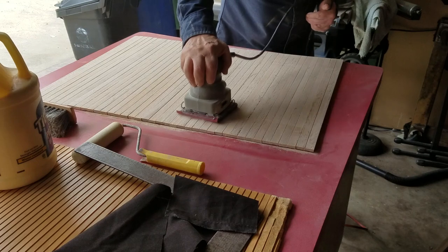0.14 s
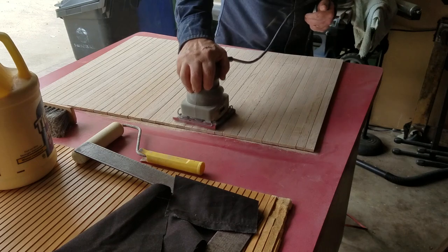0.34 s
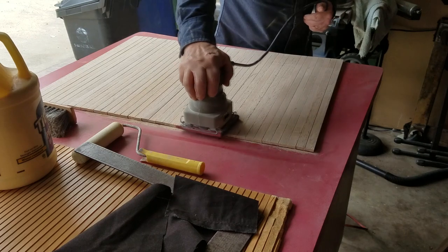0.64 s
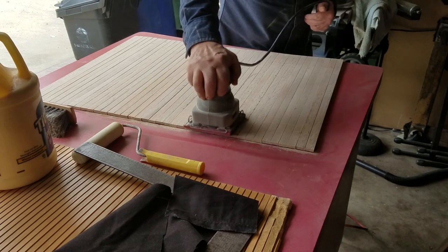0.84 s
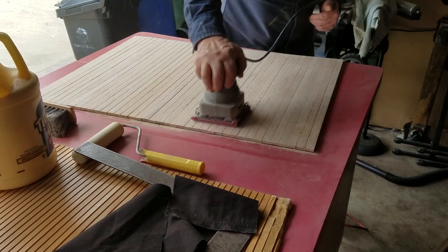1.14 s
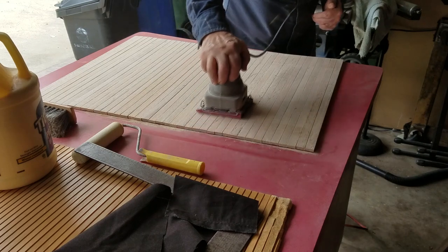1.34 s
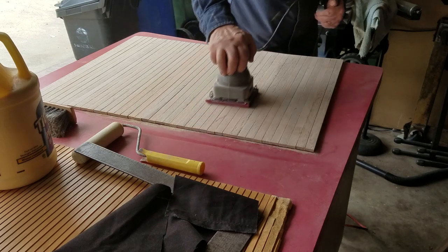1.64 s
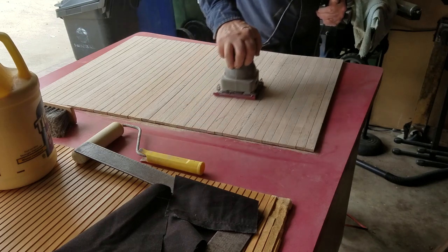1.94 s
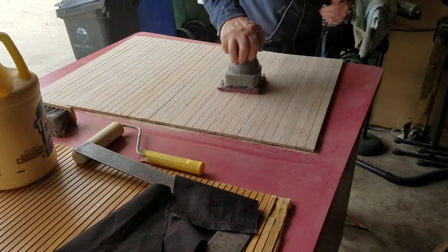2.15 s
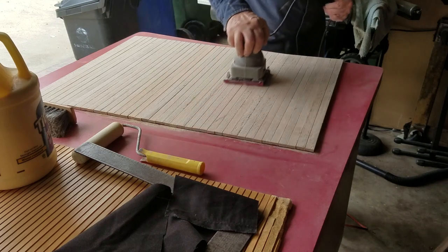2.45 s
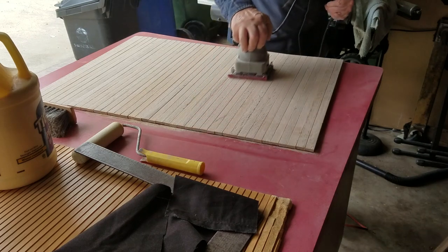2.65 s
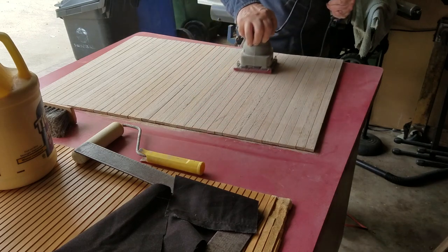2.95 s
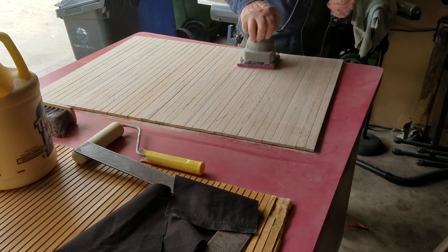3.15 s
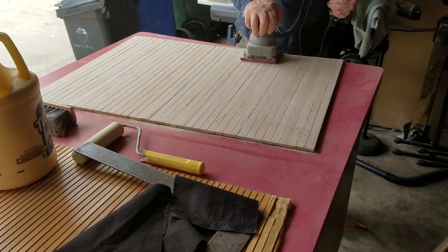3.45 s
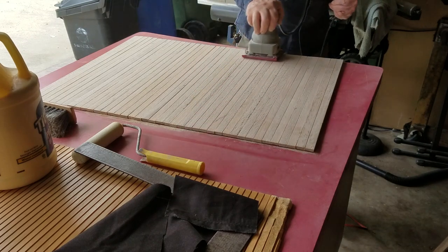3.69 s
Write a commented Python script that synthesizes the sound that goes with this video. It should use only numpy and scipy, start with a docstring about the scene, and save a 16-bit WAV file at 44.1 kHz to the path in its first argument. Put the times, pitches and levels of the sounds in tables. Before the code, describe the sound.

An electric palm sander buzzes steadily on a wooden panel, with one low thump.

```python
"""An electric palm sander buzzes on a wooden panel, starting at the front edge, on the left.
Its pad shakes the panel once a turn, the paper hisses in step and the fan rushes.
A faint rumble grows and ends in one low thump at 0.72 s.
The sander then slides right, over the middle to the back edge; each place colours the buzz differently."""
import sys
import numpy as np
from scipy.fft import rfft, irfft, next_fast_len
from scipy.io import wavfile
from scipy.ndimage import uniform_filter1d, map_coordinates

SR = 44100
rng = np.random.default_rng(int(sys.argv[2]) if len(sys.argv) > 2 else 0)


def dump_mix(stems):
    """Bounce the given channels to the path in sys.argv[1] as a 16-bit WAV at rate SR."""
    frames = np.atleast_2d(stems).T  # one column per channel
    limited = np.clip(frames, -1, 1)  # hard clip at full scale
    pcm = np.round(limited * 32767).astype(np.int16)
    wavfile.write(sys.argv[1], SR, pcm)


N = 168462

# motor speed (time [s], turn rate [Hz])
MOTOR_SPEED = [(0.0, 224.1), (0.52, 223.9), (0.65, 222.8), (1.4, 221.4), (2.5, 223.5), (3.41, 227),
               (3.82, 229.9)]
NOMINAL_HZ = MOTOR_SPEED[0][1]


def amp(db):
    """Decibels to gain."""
    return 10 ** (np.asarray(db) / 20)


def along(points, key):
    """Table read on a log axis of frequency or order."""
    keys, values = np.transpose(points)
    return np.interp(np.log(key + 1), np.log(keys + 1), values)


def curve(rows):
    """Time table, one value per sample."""
    return np.interp(np.arange(N) / SR, *np.transpose(rows))


def wobble(rate_hz):
    """Smooth random curve, rate_hz knots a second."""
    knots = rng.standard_normal(1024)
    grid = np.linspace(0, N, 2048)
    spline = map_coordinates(knots, [grid * rate_hz / SR], mode="wrap")
    return np.interp(np.arange(N), grid, spline)


def filtered(x, response):
    """Apply a gain given as a function of frequency."""
    size = next_fast_len(N + SR // 4)
    return irfft(rfft(x, size) * response(np.fft.rfftfreq(size, 1 / SR)), size)[..., :N]


def steady(x):
    """Hold the slow level at rms 1."""
    power = uniform_filter1d(np.mean(x ** 2, axis=0), size=8192)
    return x / np.sqrt(abs(power) + 1e-12)


def noise(spectrum, gate=1):
    """Gated, coloured stereo noise of rms 1: bass near mono, treble unrelated."""
    # left-right likeness (frequency [Hz], correlation [-1..1])
    likeness = [(30, 0.85), (200, 1), (600, 0.89), (1200, 0.44), (2500, 0.35), (5000, 0.41), (9000, .1),
                (15000, .03)]

    def mid_side_gains(hz):
        spread_rad = np.arccos(along(likeness, hz)) / 2
        return amp(along(spectrum, hz)) * [np.cos(spread_rad), np.sin(spread_rad)]

    mid, side = filtered(gate * rng.standard_normal((2, N)), mid_side_gains)
    stereo = np.array([mid + side, mid - side])
    return stereo / np.sqrt(np.mean(stereo ** 2) + 1e-20)


def rumble():
    """Faint low noise that grows, then drops away at the thump."""
    # loudness (time [s], level [dB])
    level = [(0, -82), (.2, -74), (.45, -71), (.6, -77), (.72, -68), (.79, -94), (3.82, -93)]
    # colour (frequency [Hz], relative density [dB])
    spectrum = [(15, 7), (30, 18), (55, -8), (100, -28), (250, -40), (1000, -90)]
    return amp(curve(level)) * noise(spectrum)


def thump():
    """A few low cycles that swell and stop short."""
    start_s, length_s, attack_s, release_s = 0.7238, 0.0228, 0.0042, 0.0038
    pitch_hz, low_cut_hz = 134, 50
    t = np.arange(N) / SR - start_s
    envelope = np.clip(t / attack_s, 0, 1) * np.clip((length_s - t) / release_s, 0, 1)
    phase = 2 * np.pi * pitch_hz * t
    burst = amp(-25) * envelope * (np.sin(phase) + amp(-11) * np.sin(2 * phase))
    return filtered(burst, lambda hz: hz ** 2 / (hz ** 2 + low_cut_hz ** 2))


def fan():
    """Steady rush of fan and pad."""
    # colour (frequency [Hz], relative density [dB])
    spectrum = [(40, -28), (65, -14.5), (95, -8.5), (140, -15.5), (250, -7.5), (340, -16.5), (480, -7.5),
                (620, -3), (780, 1.5), (1000, -1), (1300, -4), (1900, -3), (2600, -6.5), (4000, -14),
                (8000, -28)]
    return amp(-51.5) * noise(spectrum)


def paper(angle):
    """Grit scrapes the wood, hardest on the out and back stroke of each turn; the top hiss is smoother."""
    # hiss (time [s], base level [dB])
    level = [(0.0, -62.5), (0.15, -62), (0.96, -60.5), (1.23, -60), (2.81, -59), (3.62, -61), (3.65, -58),
             (3.8, -61.5), (3.82, -58)]
    # paper on wood, and the grit's high fizz (frequency [Hz], relative density [dB])
    scrape_spectrum = [(800, -32), (2200, -9.5), (3600, 1.5), (5200, 1), (6500, -2.5), (8300, -2.5),
                       (9700, -11.5), (12000, -10), (15800, -20)]
    fizz_spectrum = [(3000, -20), (7000, -13.5), (9700, -3.5), (12000, 2), (14000, -.5), (15800, -4)]
    stroke = np.exp(0.22 * np.cos(angle) + 0.34 * np.cos(2 * angle))
    grain = amp(wobble(rate_hz=250))
    scrape = amp(3) * noise(scrape_spectrum, gate=stroke * grain)
    fizz = amp(4) * noise(fizz_spectrum, gate=stroke ** 0.61)
    return amp(curve(level)) * (scrape + fizz)


def panel_db(place, tables, key):
    """The panel's response, sliding between its front, middle and back colours."""
    return np.interp(place, np.arange(len(tables)), [along(table, key) for table in tables])


def spots_db(order):
    """An order swells or sinks as the pad crosses its live and dead spots."""
    # spots on the panel (time [s], length [s], order [-], boost [dB])
    spots = [(.59, 0.26, 7, 8), (1.06, .45, 13, 9.5), (1.43, .32, 22, 9), (1.547, 0.74, 2, -3.5),
             (2.25, 0.28, 24, 2), (2.55, .45, 9, -9.5), (2.62, .4, 19, 8), (3.08, .35, 7, 4),
             (3.17, 0.18, 18, 5), (3.765, 0.15, 36, 9.5), (3.8, 0.36, 2, 6.5)]
    t = np.arange(N) / SR
    return sum(boost_db * np.exp(-(2 * (t - time_s) / length_s) ** 2)
               for time_s, length_s, k, boost_db in spots if k == order)


def partial(angle, order, level_db, fade_db=0, fade_hz=2.396, pan_db=0):
    """One multiple of the motor speed, fading and fluttering; low orders pan with the sander."""
    # sander's sideways path (time [s], position [-1 left, 1 right])
    across = [(0, -.9), (.7, -1.2), (1.6, -0.71), (2.1, 0.26), (2.6, 0.57), (3.1, 0.56), (3.82, 0.61)]
    flutter_db, flutter_hz = 0.6, 35
    scatter_rad, drift_rad = 1.22, 0.48  # the panel smears each stroke
    lead_s, direct_hz = 0.00015, 1110  # left microphone's lead; echoes blur direction above direct_hz
    hz = order * NOMINAL_HZ
    level_db = level_db + spots_db(order) + fade_db * wobble(fade_hz) + flutter_db * wobble(flutter_hz)
    phase = order * angle + scatter_rad * rng.standard_normal() + drift_rad * wobble(fade_hz)

    # the microphones differ by direction, plus a random part growing with pitch
    leftward = -curve(across) / (1 + (hz / direct_hz) ** 6)
    diffuse = (hz / 850) ** 0.48 * min(fade_db, 1)
    apart_rad = np.pi * hz * lead_s * leftward + 0.23 * diffuse * wobble(fade_hz)
    direction_db = 1.5 * leftward * min(2 * hz / direct_hz, 1)
    lean = amp((pan_db + direction_db + 2.5 * diffuse * wobble(fade_hz)) / 2)
    gains = amp(level_db) * np.array([lean, 1 / lean]) * 2 / (lean + 1 / lean)
    phases = np.array([phase + apart_rad, phase - apart_rad], dtype=np.float32)
    return np.sqrt(2) * gains * np.sin(phases)


def rattle(angle, place):
    """The pad's hard strokes: orders 13-47, coming and going quickly."""
    # treble rattle (time [s], base level [dB])
    level = [(0.0, -54), (0.46, -55), (0.74, -55), (0.77, -51.5), (0.9, -55.5), (1.81, -50.5),
             (2.01, -52.5), (2.34, -50.5), (2.8, -55), (3.04, -54), (3.15, -49.5), (3.48, -51),
             (3.82, -48.5)]
    # colour at each place (frequency [Hz], relative level [dB])
    front = [(2900, 0.5), (3130, 0), (3350, -5), (3600, -1), (4200, -4), (4500, -3), (4900, -1),
             (5500, -7.5), (6500, -15), (8200, -12.5), (11000, -23)]
    middle = [(2880, 1), (3120, -12), (3350, -9), (3770, 3), (4220, -7.5), (4440, -3.5), (4880, -4),
              (5110, -8.5), (5340, 2.5), (5800, -12), (6800, -18), (8400, -9.5), (11000, -14)]
    back = [(2900, -3.5), (3350, -8), (3620, 3), (3850, -5), (4100, 2.5), (4700, -8), (5000, -2.5),
            (5600, -1), (6100, -14), (7000, -16), (8150, -9), (8800, -16), (11000, -18)]
    partials = 0
    for order in range(13, 48):
        colour_db = panel_db(place, (front, middle, back), order * NOMINAL_HZ)
        partials += partial(angle, order, colour_db, fade_db=3.2, fade_hz=4.5)
    return amp(curve(level) - 1.5) * steady(partials)


def buzz(angle, place):
    """The pad shakes the panel: three strong orders, and weaker ones coloured by the sander's place."""
    # orders 1, 3, 6 and 7-12 (time [s], base level [dB])
    hum_early, hum_late = [
        [(0.0, -44), (0.022, -46), (0.538, -44), (0.68, -44.5)],
        [(0.8, -45), (1.58, -48), (2.87, -47), (3.78, -51)],
    ]
    drone_level = [(0.0, -46), (0.03, -46), (0.48, -47), (0.58, -52.5), (1.0, -44), (2.32, -45.5),
                   (2.5, -44), (2.84, -46), (3.38, -45), (3.51, -44), (3.73, -48.5), (3.82, -62)]
    whine_level = [(0.0, -48.5), (0.18, -52), (0.34, -58), (0.61, -49.5), (0.87, -55), (1.15, -47.5),
                   (1.62, -49.5), (1.75, -57), (2.32, -51), (2.63, -54), (2.95, -48.5), (3.44, -51.5),
                   (3.73, -45.5), (3.82, -44.5)]
    mid_level = [(0.0, -45.5), (0.15, -46.5), (0.41, -50), (0.61, -45.5), (0.79, -49.5), (1.34, -46),
                 (1.58, -49.5), (1.7, -47.5), (2.65, -54), (3.01, -48), (3.32, -48), (3.71, -41),
                 (3.74, -47), (3.82, -50)]
    # whine's pan (time [s], left minus right [dB])
    whine_pan = [(0, -10), (.7, -12), (1.15, -8.5), (1.6, 5), (2.1, 13), (2.6, 3), (3.1, -1), (3.82, -5.5)]
    # panel response at each place (order [-], relative level [dB])
    front = [(1, 0), (2, -9.5), (3, -5), (4, -16), (5, -9), (6, -11), (7, -7), (8, -22), (9, -8), (10, -14),
             (11, -17), (12, -18)]
    middle = [(1, 0), (2, -13.5), (3, 1), (4, -13), (5, -22.5), (6, -0.5), (7, -13), (8, -17), (9, -7),
              (10, -12), (11, -20), (12, -15)]
    back = [(1, 0), (2, -14.5), (3, 0), (4, -9.5), (5, -6), (6, -3), (7, -10.5), (8, -14.5), (9, -5.5),
            (10, -15), (11, -10.5), (12, -16.5)]

    def coloured(orders, fade_db):
        return sum(partial(angle, k, panel_db(place, (front, middle, back), k), fade_db) for k in orders)

    hum = partial(angle, order=1, level_db=curve([*hum_early, *hum_late]) + 2.5)
    drone = partial(angle, order=3, level_db=curve(drone_level))
    whine = partial(angle, order=6, level_db=curve(whine_level) - 0.16, pan_db=curve(whine_pan))
    low = amp(-45) * coloured((2, 4, 5), fade_db=1.2)
    mid = amp(curve(mid_level) - 0.5) * steady(coloured(range(7, 13), fade_db=1.8))
    return hum + drone + whine + low + mid


def scene():
    """One shaft angle drives buzz, rattle and paper, over fan, thump and rumble."""
    # sander's path (time [s], place [0 front edge, 1 middle, 2 back edge])
    path = [(0, 0.16), (.7, 0.056), (1.1, 0.78), (1.5, 0.93), (2.4, 1.07), (3.1, 1.77), (3.82, 1.83)]
    # sander's stereo balance (frequency [Hz], left minus right [dB])
    balance = [(60, 1), (220, -2), (670, -2.1), (900, -1), (1300, 1), (2500, 1.1), (5000, -0.5), (7500, 5),
               (10000, 7), (12000, 3.5), (15000, 8.5)]
    jitter_turns = 0.0021 * wobble(rate_hz=70)  # the pad's uneven drag
    angle = 2 * np.pi * (np.cumsum(curve(MOTOR_SPEED)) / SR + jitter_turns)
    place = curve(path)
    sander = fan() + buzz(angle, place) + rattle(angle, place) + paper(angle)
    sander = filtered(sander, lambda hz: amp(np.outer([0.5, -0.5], along(balance, hz))))
    return sander + thump() + rumble()


def record(dry):
    """Brick-wall low-pass."""
    top_hz = 15800
    return filtered(dry, lambda hz: hz < top_hz)


dry = scene()
out = record(dry)
dump_mix(out)
```